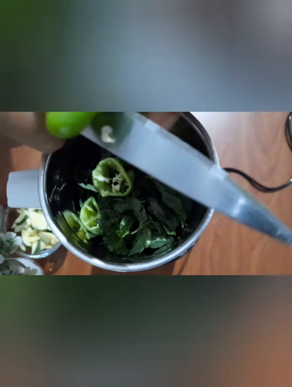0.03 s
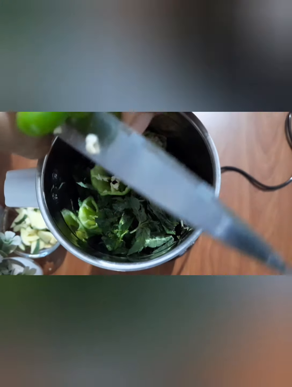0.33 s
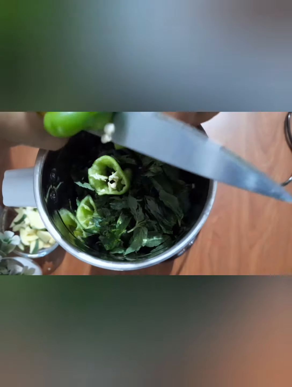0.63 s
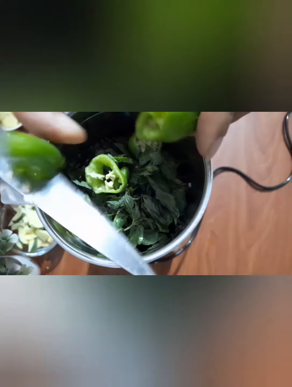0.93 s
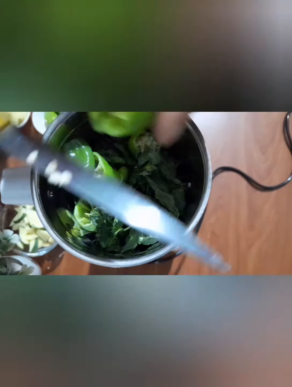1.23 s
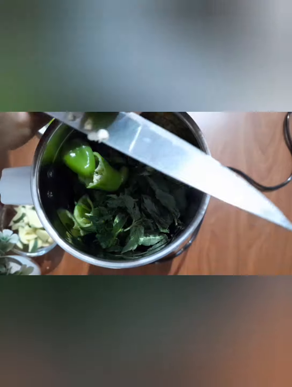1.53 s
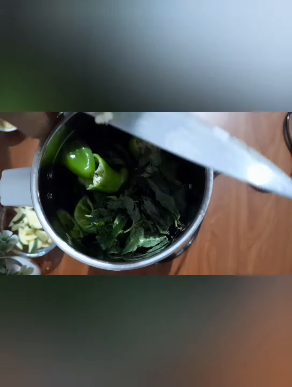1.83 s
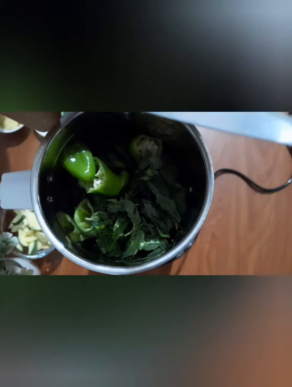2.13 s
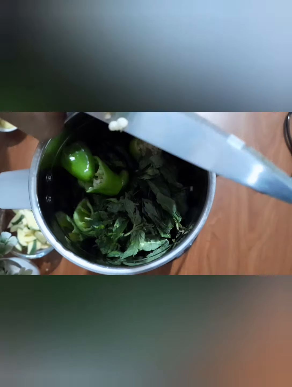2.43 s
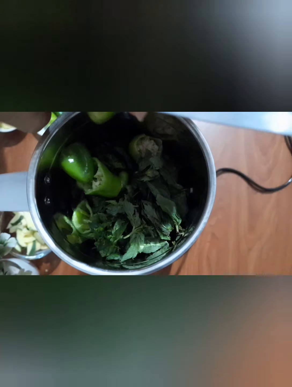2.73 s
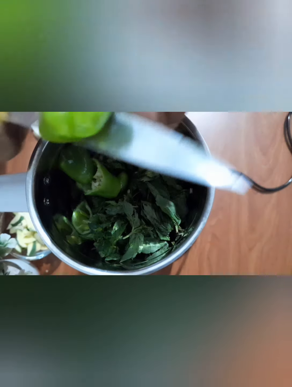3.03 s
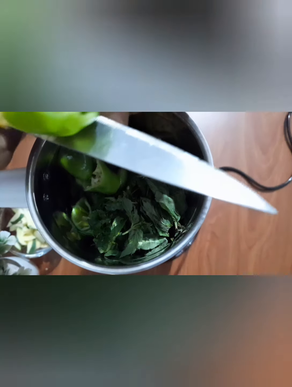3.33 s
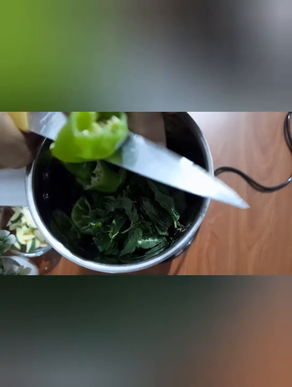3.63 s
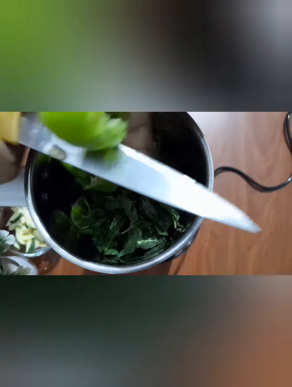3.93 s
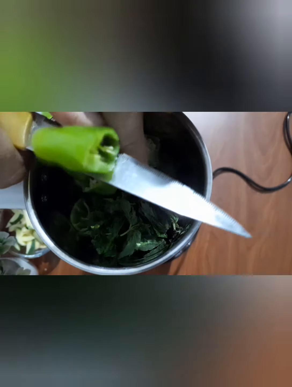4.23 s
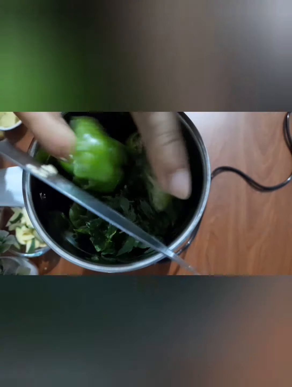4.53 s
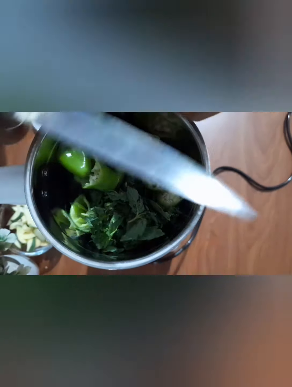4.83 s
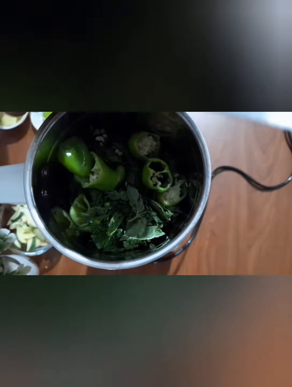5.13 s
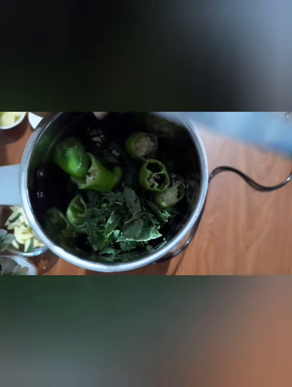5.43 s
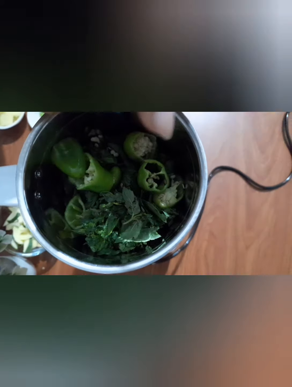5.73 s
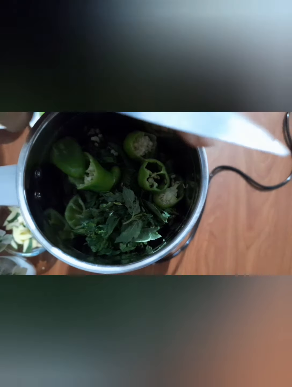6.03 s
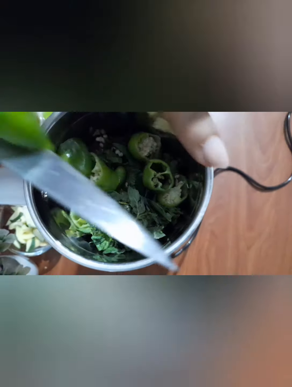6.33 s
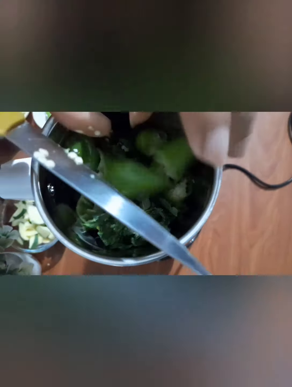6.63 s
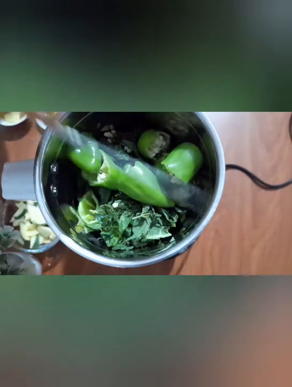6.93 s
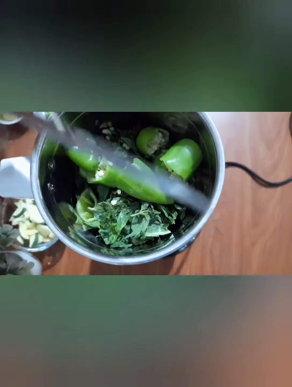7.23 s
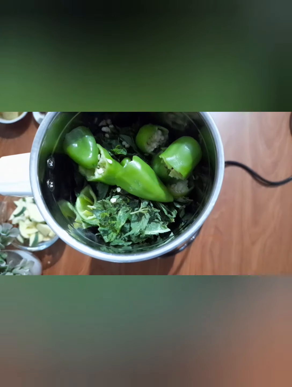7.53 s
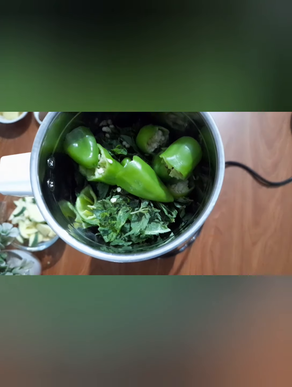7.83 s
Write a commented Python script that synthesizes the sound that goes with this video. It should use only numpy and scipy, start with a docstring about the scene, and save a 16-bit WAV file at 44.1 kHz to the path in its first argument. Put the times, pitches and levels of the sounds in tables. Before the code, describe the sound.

Close to the microphone in a small, quiet kitchen, a knife cuts green peppers over a steel pot. Wet crunches and crisp snaps come in clusters, with dull knocks from the blade and falling pieces. The cutting softens midway to little ticks and faint squeaks, then returns with a loud crack and thud. Near the end the blade clicks on the rim and twangs briefly. Low handling rumble lies underneath.

```python
"""A wet crunch and a crisp snap: green peppers cut in the hand over a steel pot on a wooden table,
close to the microphone in a small kitchen. Cells burst under the blade and the pepper wall cracks,
both coloured by the hollow of each cut. The blade knocks dully, then pieces thud into the pot, with
faint squeaks later on; near the end the blade scrapes the rim, clicks and twangs.
Low handling rumble, finger ticks and faint room noise lie underneath."""
import sys
import numpy as np
from scipy import signal
from scipy.fft import rfft, irfft
from scipy.io import wavfile
from scipy.ndimage import uniform_filter1d

SR = 44100
rng = np.random.default_rng(int(sys.argv[2]) if len(sys.argv) > 2 else 0)


def file_out(sig):
    """Save sig as 16-bit WAV at sys.argv[1]."""
    # one column per channel
    cols = np.atleast_2d(sig).T
    # limit, then scale
    lim = np.clip(cols, -1, 1)
    pcm = np.round(lim * 32767).astype(np.int16)
    wavfile.write(sys.argv[1], SR, pcm)


N = 347067
TIME_S = np.arange(N) / SR

# room noise spectrum: freq_hz, gain_db
ROOM_SPECTRUM = [(76, -30.5), (130, -3), (295, -15), (407, -9.5), (449, -16), (487, -9), (538, -19),
                 (870, -20), (1350, -27), (2060, -20), (3390, -37.5), (3980, -30.5), (6300, -33),
                 (7540, -45), (15500, -36)]
# deep sway envelope: time_s, level_db
SWAY_ENVELOPE = [(0.0, -68), (0.44, -64), (0.59, -78), (1.31, -59.5), (3.7, -72), (3.99, -68),
                 (4.56, -81.5), (4.62, -68), (5.41, -78.5), (5.52, -60), (5.74, -72.5), (6.64, -72),
                 (7.56, -58), (7.87, -61)]
# table hum envelope: time_s, level_db
HUM_ENVELOPE = [(0.0, -55), (0.08, -64), (0.46, -54.5), (0.5, -67), (0.94, -67.5), (0.96, -57),
                (1.38, -63.5), (2.01, -49.5), (2.41, -53), (2.5, -65), (2.58, -53), (2.74, -68), (3.9, -59),
                (4.4, -69.5), (5.44, -69.5), (5.52, -48.5), (5.61, -62.5), (5.85, -69), (5.92, -57.5),
                (6.33, -69), (6.44, -60.5), (6.75, -68), (7.08, -55.5), (7.23, -68), (7.41, -49.5),
                (7.67, -50.5), (7.87, -59)]
# shifts of grip: centre_s, length_s, level_db
GRIP_SHIFTS = [(0.017, .1, -56.5), (0.2, .14, -64), (1.18, 0.058, -61), (2.03, .08, -56),
               (2.39, 0.062, -48), (2.602, .1, -56), (3.003, 0.17, -60.5), (3.498, .08, -58),
               (4.65, 0.091, -58), (6.818, 0.16, -61.5), (7.86, 0.17, -56.5)]
# spectrum of breaking flesh: freq_hz, gain_db
FLESH_SPECTRUM = [(300, -5), (600, -3), (790, -9.5), (1100, -4), (1650, 1.5), (2100, 3), (2600, -6.5),
                  (3150, -5), (4000, -3), (4800, 0.5), (6000, 4.5), (7200, 2.5), (8300, -8), (12000, -5.5)]
# body, crack, fizz and air bands: low_hz, high_hz
FLESH_BANDS = [(480, 1700), (1700, 4400), (4400, 8300), (8300, 18000)]
# hollow left by each cut: start_s, pitch_hz, body_re_crack_db, fizz_re_crack_db
HOLLOWS = [(0, 1130, 0, 0.5), (0.2, 2100, -2, 0.5), (1.0, 2910, -8, 5), (1.8, 3150, -11, 1),
           (2.3, 2750, -4, 0), (2.5, 3800, -8.5, 2), (2.98, 3950, -5.5, 3.5), (3.4, 4100, -7, 0.5),
           (4.5, 2200, -1, 3.5), (5.3, 1930, -1.5, 0.5), (5.615, 1370, -0.5, 0), (5.99, 3650, -3, 4),
           (6.13, 2145, 1, 2)]
# blade strokes and scrapes (through the flesh, along the pepper, on the pot rim):
# start_s, end_s, level_db, brightness_db
STROKES = [(0, .09, -49.5, -8.5), (0.233, 0.267, -60, -7), (0.266, 0.321, -51, -10.5),
           (.37, .49, -57.5, -6), (0.491, .64, -53, -3.5), (.68, 0.758, -56.5, -3),
           (1.16, 1.249, -65.5, -1), (1.44, 1.501, -70, 3), (1.62, 1.74, -71.5, -4),
           (1.864, 1.95, -48.5, -7.5), (1.975, 2.05, -43.5, 0), (2.049, 2.169, -54.5, -3),
           (2.22, 2.349, -63.5, -6.5), (2.35, 2.439, -48, -11), (2.509, 2.549, -58.5, 4),
           (2.54, 2.679, -48, -1), (2.68, 2.871, -59, 0), (2.875, 2.939, -58.5, 6), (3, 3.072, -65, -3),
           (3.1, 3.179, -61, 1.5), (3.28, 3.38, -66, -2), (3.459, 3.578, -64.5, 4), (4.075, 4.241, -67, -1),
           (4.572, 4.72, -61, -1), (5.411, 5.47, -73.5, 7.5), (5.5, 5.62, -44.5, -4.5),
           (5.619, 5.76, -51, -1), (5.799, 5.91, -50.5, -1), (6.025, 6.101, -53.5, -2.5),
           (6.165, 6.198, -51, -7.5), (6.39, 6.451, -69.5, -12), (6.659, 6.779, -61, -8.5),
           (6.979, 7.099, -77, 3)]
# sharp snaps (pepper wall cracking; last, the blade clicking on the pot rim):
# start_s, level_db, brightness_db, tear_s
SHARP_SNAPS = [(0.0085, -29.5, -7.5, 0.0055), (0.264, -58, -3, .0023), (0.291, -42, -9, 0.0037),
               (0.299, -45.5, -15, .0004), (0.304, -43, -14, 0.0014), (0.458, -47, -2.5, 0.0097),
               (0.501, -39, -5.5, 0.0057), (0.531, -30, -12, 0.0053), (0.538, -44, -9, 0.0031),
               (0.7443, -41.5, -8.5, 0.0047), (1.1135, -57, 2.5, .0006), (1.191, -58.5, -0.5, .0019),
               (1.469, -57, 0, 0.0022), (1.629, -63.5, -1.5, .0036), (1.857, -46, -11, .001),
               (1.8754, -41, -13, 0.0038), (1.887, -46, -10, .0056), (1.919, -47.5, -3.5, .0027),
               (1.935, -47, -7, .004), (1.9663, -40, -3, .0005), (1.985, -35, -3, .0065),
               (1.996, -28, -10.5, .0011), (2.0, -23.5, -6.5, 0.00076), (2.0041, -24, -7, 0.0022),
               (2.06, -43, -5, 0.0028), (2.1, -47, -1.5, 0.00092), (2.155, -51, -7, .0018),
               (2.354, -47, -14, 0.0012), (2.408, -45, -12, 0.0039), (2.428, -50, -16, 0.0011),
               (2.515, -55, 4, 0.0004), (2.5424, -39, -11, 0.0014), (2.557, -35.5, -3.5, 0.0046),
               (2.6119, -41, -1, .002), (2.635, -34.5, 1, 0.0035), (2.703, -51, -4, 0.0024),
               (2.789, -53, 12, .0005), (2.833, -55, 0, 0.00078), (2.887, -55.5, 4.5, 0.0035),
               (3.014, -52, -10, 0.0037), (3.114, -53.5, 5, 0.01), (3.2928, -59.5, -3, 0.0013),
               (3.484, -58, 8, .0016), (3.496, -62, 14, 0.0035), (3.5321, -64, 9.5, .0023),
               (3.566, -62, 6, .001), (4.059, -54, -7, 0.00044), (4.087, -60.5, 13.5, 0.0037),
               (4.1368, -60.5, 12.5, .002), (4.1988, -61.5, 15.5, 0.0024), (4.282, -59, 6, .0004),
               (5.468, -57.5, 7.5, .0004), (5.475, -46, -5, 0.00098), (5.503, -55, 3, .0006),
               (5.5134, -24, -11.5, 0.0035), (5.546, -41, -4, 0.0059), (5.594, -45.5, -1, .0025),
               (5.634, -30, -8, 0.0025), (5.6799, -41.5, -0.5, 0.0022), (5.7665, -45.5, -5.5, 0.0015),
               (5.816, -52, 5, .004), (5.874, -44.5, -2, 0.0023), (6.0507, -31.5, -7, 0.00028),
               (6.066, -46.5, -1, .0025), (6.173, -48, -7, .004), (6.1842, -37.5, -15, .0006),
               (6.6867, -45.5, -12, 0.0055)]
# dull knocks (a damped knock of the blade, then pieces landing in the pot):
# start_s, level_db, pitch_hz, pot_re_knock_db
DULL_KNOCKS = [(0.2043, -37.5, 325, -7.5), (0.2134, -33.5, 358, -13.5), (1.113, -53, 256, -7),
               (1.185, -44, 345, -26), (2.003, -50, 484, -2.5), (5.514, -27, 420, -8)]
# modes of the filled pot on the table: freq_hz, level_db, t60_s
POT_MODES = [(87, -7, 0.22), (141.6, -8, .1), (204.3, -17, 0.16), (299, -9, 0.035), (479, -3, .16),
             (594, -8, 0.13)]
# faint squeaks: centre_s, length_s, pitch_hz, level_db
SQUEAK_TONES = [(3.53, .08, 1053, -60.5), (4.101, 0.063, 1020, -60.5), (4.65, .08, 1693, -64),
                (4.9, 0.066, 1497, -65), (6.52, 0.1, 2970, -76), (7.86, 0.081, 777, -59),
                (7.86, 0.078, 1190, -61)]
# knife blade modes: freq_hz, level_db, t60_s
BLADE_MODES = [(336.8, -3, 0.44), (355, -13, 0.13), (420, -13.5, 0.14), (1820, -39, 0.22),
               (2140, -41.5, 0.33), (3034, -41, 0.3), (4380, -42.5, 0.25), (4420, -42.5, 0.21),
               (5000, -47, 0.27)]
# kitchen echoes: low_hz, high_hz, level_db, t60_s
ECHO_BANDS = [(99.2, 630, -21, .28), (833, 2140, -15, 0.2), (2555, 7000, -10, 0.25), (7420, 9900, -12, .16),
              (11000, 15400, -12.5, .24)]
# balance of the two microphone ports: freq_hz, left_re_right_db
PORT_BALANCE_DB = [(100, -0.5), (220, 2), (340, -4.5), (500, 1), (1500, -0.5), (2600, 5.5), (3800, 1.5),
                   (4500, -2.5), (6400, -6), (8200, 8), (10200, 8), (11400, 2.5), (14500, -1.5),
                   (16000, -2.5)]


def from_db(db):
    """Decibels to gain."""
    return 10 ** (np.asarray(db) / 20)


def unit_rms(x):
    """Scale to rms 1."""
    return x / np.sqrt(np.mean(x ** 2) + 1e-20)


def envelope_db(points):
    """Interpolate (time_s, level_db) points per sample."""
    return np.interp(TIME_S, *np.transpose(points))


def add(out, start_s, x):
    """Mix x into out from start_s."""
    i = max(round(start_s * SR), 0)
    out[..., i:i + x.shape[-1]] += x[..., :N - i]


def band(x, low_hz, high_hz):
    """Causal band-pass."""
    sos = signal.butter(2, [low_hz, min(high_hz, SR * .45)], "band", fs=SR, output="sos")
    return signal.sosfilt(sos, x + 1e-18)


def resonance(x, hz, width_hz):
    """Two-pole resonance, peak gain 1."""
    r = np.exp(-np.pi * width_hz / SR)
    feedback = [1, -2 * r * np.cos(2 * np.pi * hz / SR), r * r]
    return signal.lfilter(np.array([1, 0, -1]) * (1 - r * r) / 2, feedback, x + 1e-18)


def colour(x, points, size=2048):
    """Minimum-phase filter through (freq_hz, gain_db) points."""
    hz, db = np.transpose(points)
    curve_db = np.interp(np.log(np.arange(size // 2 + 1) * SR / size + 1), np.log(hz), db)
    cepstrum = irfft(np.log(from_db(curve_db)))[:size // 2]
    cepstrum[1:] *= 2
    response = irfft(np.exp(rfft(cepstrum, size)))[:size // 2]
    response = response.reshape((1,) * (x.ndim - 1) + (-1,))
    return signal.fftconvolve(x, response, axes=-1)[..., :x.shape[-1]]


def stereo_noise(side_gain):
    """Common noise plus an antiphase part."""
    mid, side = rng.standard_normal((2, N))
    return mid + side_gain * side * [[1], [-1]]


def ring(hz, t60_s):
    """One second of a struck mode."""
    t = TIME_S[:SR]
    return np.sin(2 * np.pi * hz * t) * from_db(-60 * t / t60_s)


def pan(x, left_db):
    """Raise left over right by left_db."""
    return x * from_db([[left_db / 2], [-left_db / 2]])


def to_ports(x, scatter_db, scatter_t60_s, size=1024):
    """Sound reaches the left port first; pot, hands and blade scatter it just after."""
    t = TIME_S[:size]
    lag_s = .0003 * rng.uniform(.8, 1.25)
    scatter = rng.standard_normal((2, size)) * from_db(-60 * t / scatter_t60_s) * (t > lag_s)
    paths = from_db(scatter_db) * unit_rms(scatter) / np.sqrt(size)
    paths[0, 0] += 1
    paths[1, round(lag_s * SR)] += 1
    return signal.fftconvolve(x[None], paths, axes=-1)[:, :len(x)]


def bursts(per_s, spread_db, size):
    """Random clicks, a few much louder than the rest."""
    chance, strength, sign = rng.random((3, size))
    level_db = spread_db * np.minimum(-np.log(1 - strength), 4)
    return (chance < per_s / SR) * from_db(level_db) * np.sign(sign - .5)


def voicing(time_s, level_db, bright_db):
    """Body, crack, fizz and air levels and hollow pitch at time_s."""
    _, hollow_hz, body_db, fizz_db = HOLLOWS[sum(time_s >= row[0] for row in HOLLOWS[1:])]
    offsets_db = np.array([body_db + .23 * bright_db, 0, fizz_db + .58 * bright_db, bright_db])
    return level_db + offsets_db, hollow_hz


def flesh(clicks, levels_db, hollow_hz, hollow_db, hollow_width_hz, spots=3):
    """Clicks from several spots, coloured by flesh and hollow; rms set per band."""
    spot = rng.integers(0, spots, len(clicks))
    x = sum(to_ports(clicks * (spot == k), scatter_db=-2, scatter_t60_s=.018) for k in range(spots))
    x = colour(x, FLESH_SPECTRUM)
    x = x + from_db(hollow_db) * resonance(x, hollow_hz, hollow_width_hz)
    return sum(from_db(db) * unit_rms(band(x, *edges)) for edges, db in zip(FLESH_BANDS, levels_db))


def room_tone(level_db):
    """Steady kitchen noise: alike at both ports in the bass, unrelated in the treble."""
    mid, side = rng.standard_normal((2, N))
    diffuse = mid + colour(side, [(150, -9.5), (450, -4.5), (1000, 1)]) * [[1], [-1]]
    return from_db(level_db) * unit_rms(band(colour(diffuse, ROOM_SPECTRUM), 89.7, 18800))


def hand_motion_db(holding_db, hum_share):
    """Rustle envelope: follows the table hum, swells at each shift of grip."""
    hum_db = envelope_db(HUM_ENVELOPE)
    holding = from_db(holding_db + hum_share * (hum_db - hum_db.mean()))
    shifts = sum(from_db(db) * np.exp(-np.minimum((2 * (TIME_S - centre_s) / length_s) ** 2, 20))
                 for centre_s, length_s, db in GRIP_SHIFTS)
    return 20 * np.log10(np.hypot(holding, shifts))


def rumble(hz, width_hz):
    """Noise-driven low resonance, evened in level."""
    x = resonance(resonance(stereo_noise(side_gain=.25), hz, width_hz), hz, width_hz)
    power = uniform_filter1d(np.mean(x ** 2, axis=0), 3000)
    return x / np.sqrt(power + 1e-20)


def handling(motion_db, sway_gain_db, hum_gain_db, rustle_gain_db):
    """Hands rustle; moving arms shake the table and the microphone support."""
    rub = band(stereo_noise(side_gain=.354), 94, 590)
    rub = unit_rms(colour(rub, [(140, 2), (240, -5), (450, 0), (700, -5)]))
    sway = from_db(envelope_db(SWAY_ENVELOPE) + sway_gain_db) * rumble(hz=56.8, width_hz=20)
    hum = from_db(envelope_db(HUM_ENVELOPE) + hum_gain_db) * rumble(hz=92.8, width_hz=16)
    return sway + hum + from_db(motion_db + rustle_gain_db) * rub


def finger_ticks(motion_db, gain_db):
    """Skin and leaves tick faintly as the hands move."""
    clicks = bursts(per_s=43, spread_db=2.5, size=N)
    ticks = flesh(clicks, (-2.5, 1.5, 1.5, -2), hollow_hz=2200, hollow_db=-1.5, hollow_width_hz=660)
    return from_db(np.minimum(motion_db, -61) + gain_db) * ticks


def strokes(arch_exponent, tail_samples=1024):
    """Each stroke swells and eases; dense clicks merge into wet tearing or a scrape."""
    out = np.zeros((2, N))
    for start_s, end_s, db, bright_db in STROKES:
        levels_db, hollow_hz = voicing(start_s, db, bright_db)
        arch = np.hanning(round((end_s - start_s) * SR)) ** arch_exponent
        pressure = np.pad(arch, (0, tail_samples))
        clicks = bursts(per_s=1500, spread_db=5, size=len(pressure)) * pressure
        add(out, start_s, flesh(clicks, levels_db, hollow_hz, hollow_db=-3, hollow_width_hz=657))
    return out


def snaps(click_s, lead_db, crumble_db, crumble_s, gain_db, size=2560):
    """Cells give way, the wall cracks with a click and crumbles; the rim click has the same shape."""
    out, onset = np.zeros((2, N)), size // 8
    t = TIME_S[:size] - TIME_S[onset]
    gain = from_db(gain_db) * np.sqrt(.01 * SR / size)  # rms referred to 10 ms
    for start_s, db, bright_db, tear_s in SHARP_SNAPS:
        levels_db, hollow_hz = voicing(start_s, db, bright_db)
        tear_s = max(tear_s, 3e-4)
        lead = from_db(lead_db) * np.exp(-abs(t) / tear_s)
        opening = np.exp(-(t / (1.37 * tear_s)) ** 2)
        crumble = from_db(crumble_db) * np.exp(-abs(t) / crumble_s)
        force = np.where(t < 0, lead, opening + crumble)
        tear = unit_rms(bursts(per_s=6000, spread_db=3, size=size) * force) / np.sqrt(size)
        tear[onset] = np.sqrt(click_s / tear_s)  # quicker snap, stronger click
        snap = flesh(tear, levels_db, hollow_hz, hollow_db=7.5, hollow_width_hz=710)
        add(out, start_s - TIME_S[onset], gain * snap)
    return out


def knocks(knock_t60_s):
    """The damped blade or a falling piece thuds at its own pitch and shakes the pot."""
    out = np.zeros((2, N))
    pot = sum(from_db(db) * ring(hz, t60_s) * (-1) ** k for k, (hz, db, t60_s) in enumerate(POT_MODES))
    for start_s, db, hz, pot_db in DULL_KNOCKS:
        add(out, start_s, from_db(db) * (ring(hz, knock_t60_s) + from_db(pot_db) * pot))
    return out


def squeaks(width_hz):
    """Short, unsteady tones of narrow-band noise."""
    out, t = np.zeros(N), TIME_S[:SR // 2] - TIME_S[SR // 4]
    for centre_s, length_s, hz, db in SQUEAK_TONES:
        tone = resonance(resonance(rng.standard_normal(len(t)), hz, width_hz), hz, width_hz)
        swell = np.exp(-(2 * t / length_s) ** 2)
        add(out, centre_s + t[0], from_db(db) * unit_rms(tone) * swell)
    return to_ports(out, scatter_db=-.5, scatter_t60_s=.013)


def blade_twang(start_s, gain_db, swell_s, grip_at_s, grip_ramp_s, grip_db):
    """The blade slips off the rim: bending swells until the hand damps it; high modes ring on."""
    out, t = np.zeros((2, N)), TIME_S[:SR]
    grip = np.clip((t + start_s - grip_at_s) / grip_ramp_s, 0, 1)
    bending = (1 - np.exp(-t / swell_s)) * from_db(grip_db * grip)
    for hz, db, t60_s in BLADE_MODES:
        add(out, start_s, from_db(gain_db + db) * ring(hz, t60_s) * (bending if hz < 1000 else 1))
    return out


def kitchen_echoes(x, wet_db, build_s):
    """Dense wall echoes build up and decay per band."""
    t = TIME_S[:SR // 2]
    build = 1 - np.exp(-t / build_s)
    tail = np.zeros((2, len(t)))
    for low_hz, high_hz, db, t60_s in ECHO_BANDS:
        noise = band(rng.standard_normal(tail.shape), low_hz, high_hz)
        tail += from_db(db) * unit_rms(noise * from_db(-60 * t / t60_s) * build)
    return from_db(wet_db) * signal.fftconvolve(x, tail / np.sqrt(len(t)), axes=-1)[:, :N]


def scene():
    """Cutting slightly left, echoes slightly right, over handling and room noise."""
    motion_db = hand_motion_db(holding_db=-68.5, hum_share=.4)
    snapping = snaps(click_s=.00027, lead_db=-7, crumble_db=-17.5, crumble_s=.0068, gain_db=3.5)
    cutting = strokes(arch_exponent=.23) + knocks(knock_t60_s=.044) + squeaks(width_hz=145)
    cutting += finger_ticks(motion_db, gain_db=-13.5)
    twang = blade_twang(start_s=6.694, gain_db=-15.5, swell_s=.009,
                        grip_at_s=6.744, grip_ramp_s=.008, grip_db=-8)
    direct = pan(snapping, left_db=1.46) + pan(cutting, left_db=1) + twang
    echoes = kitchen_echoes(snapping, wet_db=-5, build_s=.005)
    echoes += kitchen_echoes(cutting, wet_db=-3, build_s=.005)
    echoes += kitchen_echoes(twang, wet_db=-19.5, build_s=.012)
    hands = handling(motion_db, sway_gain_db=2, hum_gain_db=1.5, rustle_gain_db=-1.5)
    return direct + pan(echoes, left_db=-2) + hands + room_tone(level_db=-62)


def record(dry):
    """Two microphone ports share each frequency unequally; band-limited to 36-15900 Hz."""
    hz, db = np.transpose(PORT_BALANCE_DB)
    shares_db = [10 * np.log10(2 / (1 + from_db(-2 * sign * db))) for sign in (1, -1)]
    ports = [colour(x, np.transpose([hz, share_db])) for x, share_db in zip(dry, shares_db)]
    ports = signal.sosfilt(signal.butter(2, 36, "high", fs=SR, output="sos"), ports)
    return signal.sosfilt(signal.ellip(10, .2, 70, 15900, fs=SR, output="sos"), ports)


dry = scene()
out = record(dry)
file_out(out)
```